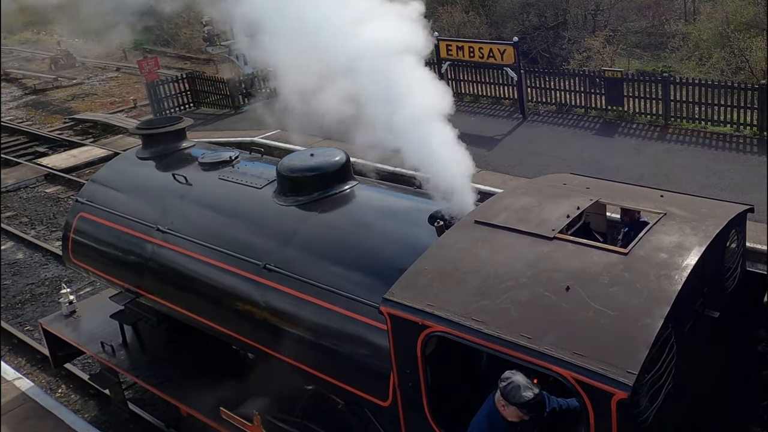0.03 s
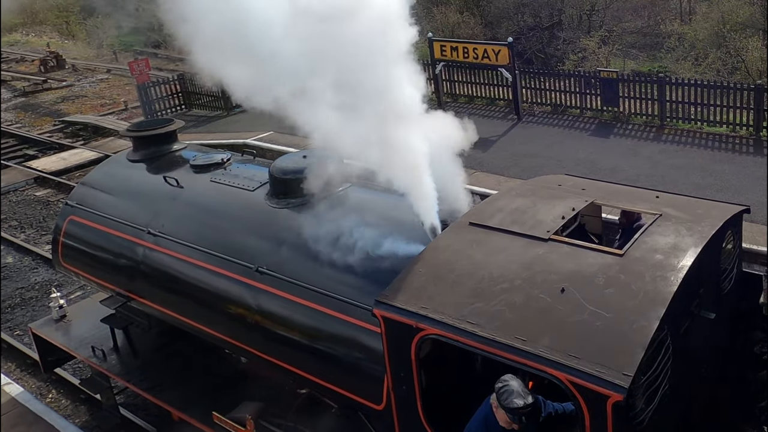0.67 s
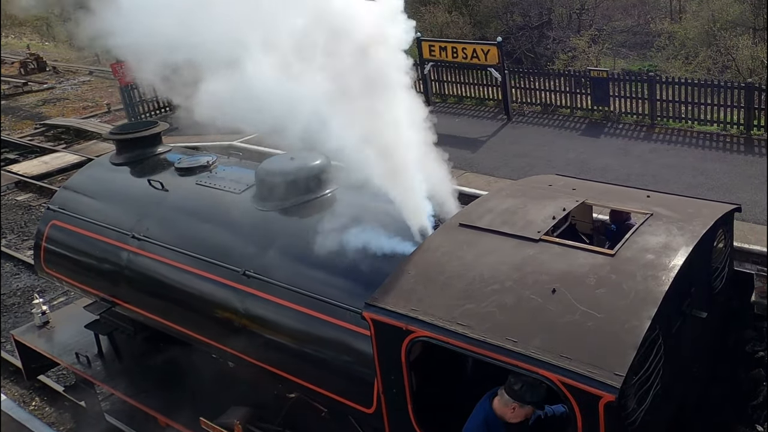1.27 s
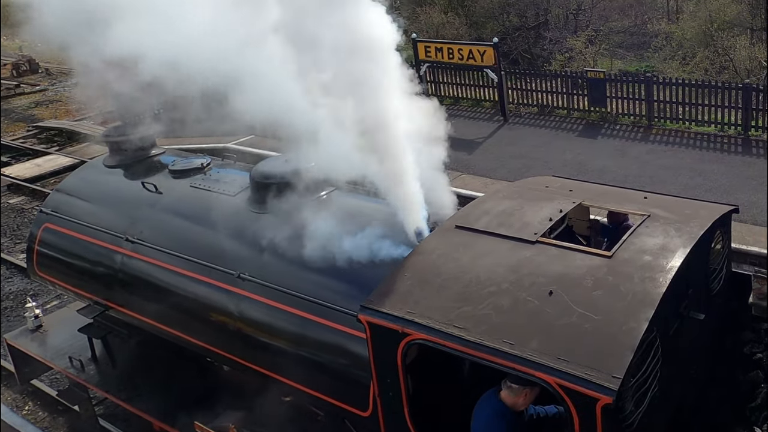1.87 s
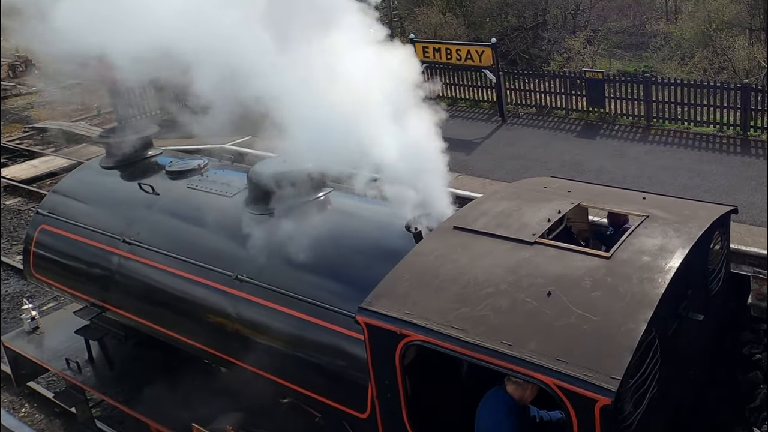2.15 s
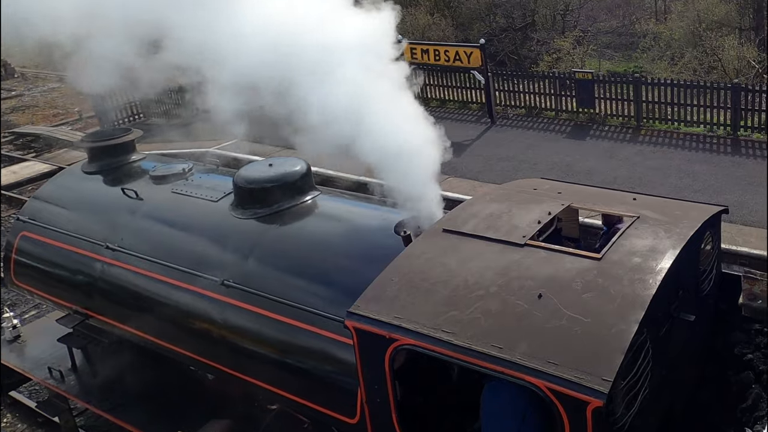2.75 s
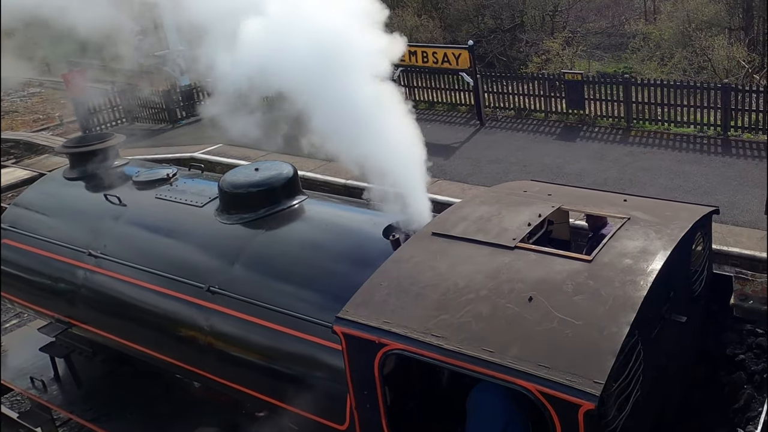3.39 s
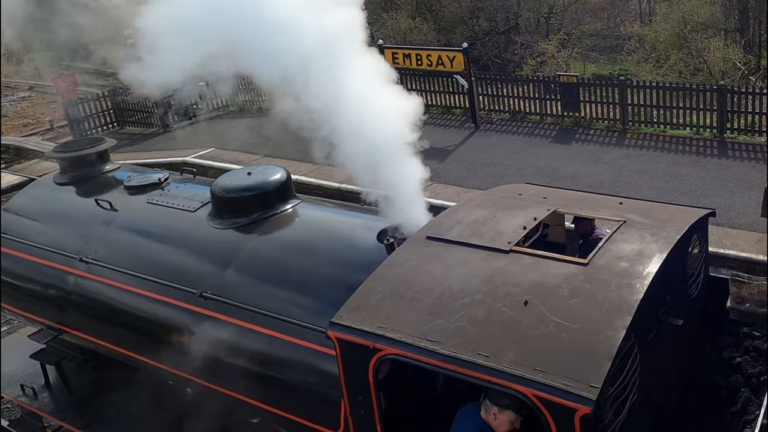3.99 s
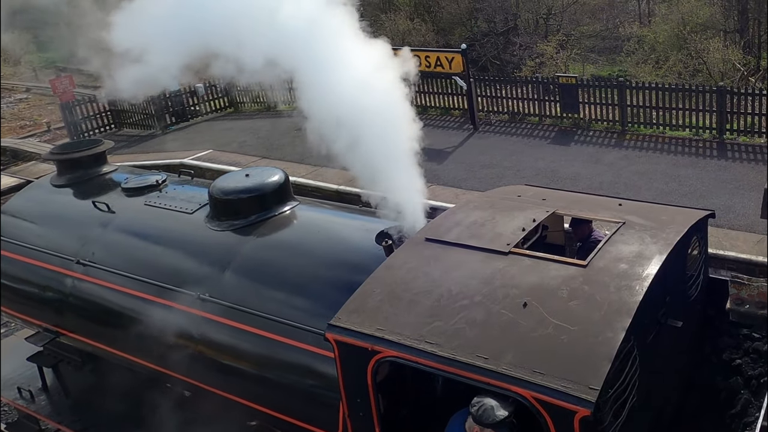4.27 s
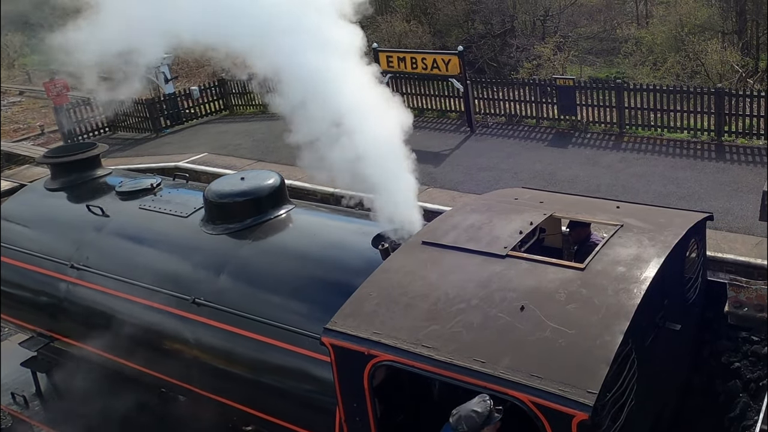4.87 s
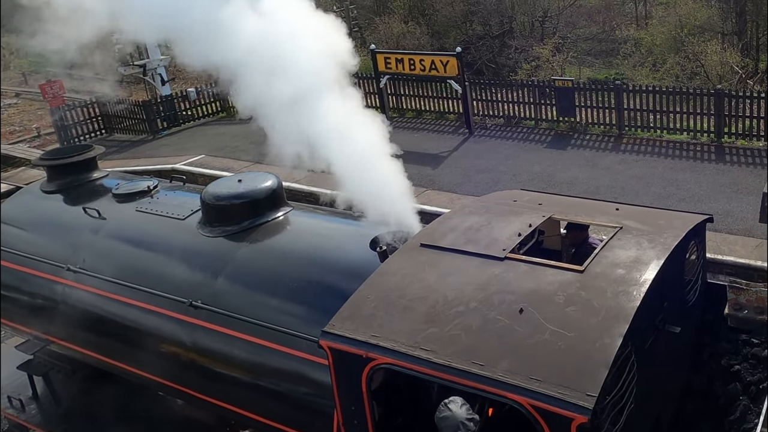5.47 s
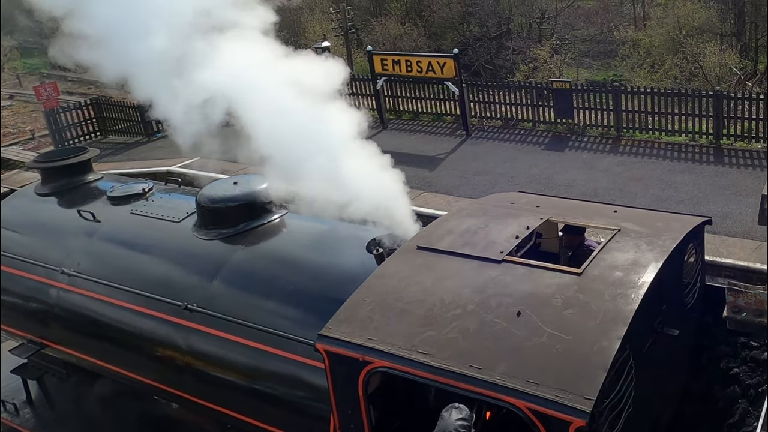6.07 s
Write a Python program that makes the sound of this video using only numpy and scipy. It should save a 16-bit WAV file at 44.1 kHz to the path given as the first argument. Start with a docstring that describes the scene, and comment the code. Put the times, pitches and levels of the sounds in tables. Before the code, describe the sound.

Steam hisses steadily from a standing locomotive, which gives a brief raspy toot followed by a longer, clear whistle.

```python
"""Just above the cab of a steam locomotive standing at a station. The safety valve blows throughout:
its turbulent jet hisses and roars. The whistle valve is eased open and wet steam spits through the
bell, a resonator that sounds a short hoarse blast, then a long clear one that rises as the bell warms.
Steel plates reflect the steam noise; the station and a wooded slope return the whistle.
An automatic gain control ducks the hiss under the whistle and lets it swell back afterwards."""
import sys
import numpy as np
from scipy import signal
from scipy.fft import rfft, irfft, next_fast_len
from scipy.io import wavfile
from scipy.ndimage import uniform_filter1d, minimum_filter1d, map_coordinates

SR = 44100
rng = np.random.default_rng(int(sys.argv[2]) if len(sys.argv) > 2 else 0)


def transcribe(signal):
    """Save signal, clipped to [-1, 1], as a 16-bit WAV file at the path in sys.argv[1]."""
    frames = np.atleast_2d(signal).T
    limited = np.clip(frames, -1, 1)
    pcm = np.round(limited * 32767).astype(np.int16)
    wavfile.write(sys.argv[1], SR, pcm)


N = 270806

# flow noise of the safety valve: (time [s], relative level [dB])
VALVE_FLOW = [(2.95, -37.5), (3.4, -39.5), (3.64, -40), (3.8, -40.5), (4.81, -35.5), (5.41, -37.5),
              (5.82, -37), (5.98, -38.5), (6.1, -37.5)]
# spectra of the safety valve's jet and plume: (frequency [Hz], relative density [dB])
JET_HISS = [(200, -24), (600, -10.5), (1000, -5.5), (1600, -5.5), (2600, -2), (3500, 0.5), (3950, -1.5),
            (4500, 1.5), (5200, -2.5), (6300, -5), (7100, -8.5), (8000, -19.5), (10000, -37)]
JET_FIZZ = [(6000, -25.5), (8000, 0.5), (9200, 1.5), (10500, -2), (12400, -3.5), (13800, -15),
            (15600, -16.5)]
PLUME_ROAR = [(60, -9.5), (160, 2.5), (235, 0.5), (310, -4.5), (420, 0.5), (530, 0.5), (700, -5),
              (1100, -4.5), (2000, -1), (4000, -24.5)]
PLUME_RUMBLE = [(12, -18.5), (25, -4), (45, 2), (65, -4), (105, -1), (150, -4), (195, -7), (250, -21),
                (600, -21.5)]
# nozzle resonances: (frequency [Hz], bandwidth [Hz], gain [dB])
NOZZLE_MODES = [(1059, 31, 1), (1278, 23, -9.5), (1460, 43, -4), (2110, 43, -11), (2470, 67, -6.5),
                (2810, 53, -11), (4590, 100, -9.5), (5530, 98, -9.5)]
# the hiss sags as the whistle valve snaps shut: (time [s], level change [dB])
SHUT_SAGS = [(1.029, -1.5), (2.105, -5)]
# reflections off tank and cab roof: (delay [s], gain [dB])
PLATE_ECHOES = [(.00136, -25), (.0053, -26), (.0078, -28), (.0092, -19), (0.0096, -22.5), (0.0121, -25.5)]
# the whistle valve is eased open, left ajar, then pulled wide; levels are relative:
# (start [s], rise [s], shut [s], jet [dB], spray [dB], puff [dB])
VALVE_PULLS = [(-.08, .665, .993, -30.5, -35, -38), (1.02, .12, 1.208, -48, -34, -46),
               (1.19, .05, 2.08, -33.5, -50, -27.5)]
# spectra of the whistle's jet, condensate and cloud: (frequency [Hz], relative density [dB])
WHISTLE_JET = [(120, -31.5), (350, 1.5), (520, -9.5), (850, 9), (1150, -5), (1350, 1), (1650, -2.5),
               (1930, 2.5), (2280, -0.5), (3100, 2.5), (3450, 4.5), (3750, -6.5), (3920, -19), (4200, -5.5),
               (4900, -13.5), (9000, -31), (15600, -38.5)]
CONDENSATE_SPRAY = [(500, -25), (2000, -21.5), (3400, -1.5), (4500, -3.5), (6200, -3.5), (7400, -11.5),
                    (9000, -24), (12400, -23), (15600, -46)]
CLOUD_BILLOW = [(12, -18.5), (35, -0.5), (65, -3), (110, -3), (180, 3.5), (250, -14.5), (360, -8.5),
                (600, -16.5)]
# slugs of water that spit, squeak and choke the tone: (time [s], half length [s], choke [dB])
WATER_SLUGS = [(0.955, 0.01, -12), (1.257, .004, -5.5), (1.299, 0.018, -7.5)]
# spells in which the bell locks into a tone: (start [s], length [s], level [dB], bend [Hz])
LOCKED_TONES = [(.84, .022, -26, 25), (.904, .012, -21, 20), (.985, .023, -17.5, 0),
                (1.183, .009, -18, -30), (1.201, .861, 0, 0)]
# the bell's pitch dips as water clears and climbs as it warms: (time [s], frequency [Hz])
BELL_PITCH = [(1.27, 787), (1.3, 797), (1.335, 774), (1.42, 768), (1.6, 788), (1.79, 802), (2.05, 803)]
# the bell's upper harmonics: (harmonic number, relative level [dB])
UPPER_HARMONICS = [(3, -24), (5, -40.5), (6, -42), (7, -53)]
# harmonics radiated mostly sideways: (harmonic number, relative upward level [dB], sideways level [dB])
EVEN_HARMONICS = [(2, -37.5, -22.5), (4, -49, -25)]
# relative gain of the two sets: (time [s], upper harmonics [dB], upward even harmonics [dB])
HARMONIC_GAINS = [(1.28, -51, -53.5), (1.474, -44, -56), (1.496, -42, -60), (1.542, -56.5, -50),
                  (1.672, -41.5, -46.5), (1.778, -39.5, -61), (1.902, -41.5, -51.5), (2.018, -41.5, -55),
                  (2.06, -41.5, -40)]
# reflections off fence, station wall, far buildings and hillside: (delay [s], gain [dB])
STATION_ECHOES = [(.065, -29.5), (.103, -18.5), (.28, -33.5), (.76, -47.5)]
# reverberation of the wooded slope: (frequency [Hz], time to decay by 60 dB [s])
SLOPE_DECAY = [(200, 0.72), (800, 2.18), (2500, 0.84), (9000, 1)]

t = np.arange(N) / SR


def amp(db):
    """Amplitude ratio of a level in decibels."""
    return 10 ** (np.asarray(db) / 20)


def unit(x):
    """Normalisation to rms 1."""
    return x / np.sqrt(np.mean(np.abs(x) ** 2) + 1e-20)


def along(points, hz):
    """Interpolation on a logarithmic frequency axis."""
    freqs, values = np.transpose(points)
    return np.interp(np.log(hz + 1), np.log(freqs + 1), values)


def curves(rows):
    """Linear interpolation in time of each column after the first."""
    times, *columns = np.transpose(rows)
    return [np.interp(t, times, column) for column in columns]


def bump(centre_s, half_s):
    """Gaussian pulse of height 1."""
    return np.exp(-((t - centre_s) / half_s) ** 2)


def step(centre_s, width_s):
    """Sigmoid rise from 0 to 1."""
    return .5 + .5 * np.tanh((t - centre_s) / width_s)


def envelope(start, attack_s, end, release_s, order=1):
    """Growth, hold and decay; order 2 rounds the foot of the attack and the shoulder of the release."""
    attack = np.clip((t - start) / attack_s, 0, 1) ** order
    return attack * np.exp(-(np.maximum(t - end, 0) / release_s) ** order)


def wobble(rate):
    """Random modulation: a spline through `rate` knots a second."""
    return map_coordinates(rng.standard_normal(int(N * rate / SR) + 4), [t * rate])


def filtered(x, response):
    """Linear filtering: the spectrum times a frequency response."""
    size = next_fast_len(N + SR // 2)
    return irfft(rfft(x, size) * response(np.fft.rfftfreq(size, 1 / SR)), size)[:N]


def echoes(x, paths):
    """Superposition of delayed, attenuated copies."""
    return sum(amp(db) * np.pad(x, (int(delay_s * SR), 0))[:N] for delay_s, db in paths)


def rush(spectrum, patchy_db):
    """Turbulence: eddies give shaped noise of rms 1 short patches of random gain."""
    cells = signal.stft(rng.standard_normal(N), nperseg=512)[2]
    eddies = uniform_filter1d(rng.standard_normal(cells.shape), size=7, axis=0)
    eddies = unit(uniform_filter1d(eddies, size=14, axis=1))
    noise = signal.istft(cells * amp(patchy_db * eddies), nperseg=512)[1][:N]
    cutoff_hz = 2 * spectrum[-1][0]
    return unit(filtered(noise, lambda hz: amp(along(spectrum, hz)) / (1 + (hz / cutoff_hz) ** 4)))


def narrow(hz, width_hz):
    """Random excitation of one resonance: narrowband noise of rms 1."""
    return unit(filtered(rng.standard_normal(N), lambda f: 1 / (1 + ((f - hz) / width_hz) ** 2)))


def nozzle_response(f):
    """Resonance: each nozzle mode adds a second-order band-pass to the direct sound."""
    return 1 + sum(amp(db) * 1j * f * width / (hz * hz - f * f + 1j * f * width)
                   for hz, width, db in NOZZLE_MODES)


def safety_valve(swell_db=13.5, fizz_db_per_s=1.35, rebound_db=0.5, rebound_s=0.26):
    """Jet noise: turbulent steam hisses and sings in the nozzle, above the plume's roar and rumble."""
    roar = amp(-16 + swell_db * bump(centre_s=3.57, half_s=0.82)) * rush(PLUME_ROAR, patchy_db=1.0)
    fizz = amp(-23 + fizz_db_per_s * t) * rush(JET_FIZZ, patchy_db=0.8)  # the jet grows finer
    hiss = amp(0.5) * rush(JET_HISS, patchy_db=0.6)
    singing = amp(-23 + t) * narrow(hz=4352, width_hz=28)  # gains 1 dB a second
    jet = filtered(hiss + singing + roar + fizz, nozzle_response)
    sag_db = sum(db * bump(time_s, half_s=0.019) for time_s, db in SHUT_SAGS)
    # once the long blast stops drawing steam, the hiss rebounds for a moment
    since_shut = np.maximum(t - SHUT_SAGS[-1][0], 0) / rebound_s
    surge_db = rebound_db * since_shut * np.exp(1 - since_shut)
    flutter_db = 0.21 * wobble(5.4) + 0.12 * wobble(60)
    flow = amp(-0.5 + curves(VALVE_FLOW)[0] + sag_db + surge_db + flutter_db)
    rumble = amp(-50.5 + 0.54 * wobble(7.4)) * rush(PLUME_RUMBLE, patchy_db=-0.85)
    return flow * jet + rumble


def steel_plates(x, scatter_db=-15, t60_s=0.08):
    """Comb filtering: sound reflected and scattered by nearby plates interferes with the direct sound."""
    lag = t[:SR // 20]
    scatter = rng.standard_normal(len(lag)) * amp(-60 * lag / t60_s)
    scattered = signal.fftconvolve(x, scatter / np.linalg.norm(scatter))[:N]
    return x + amp(scatter_db) * scattered + echoes(x, PLATE_ECHOES)


def whistle_valve(creep_db_per_s=6, puff_decay_s=0.19, billow_power=1.5):
    """Throttling: the strengths of jet, spray, cloud and bell excitation follow powers of the opening."""
    jet, spray, billow, stir = np.zeros((4, N))
    for start, rise_s, shut, jet_db, spray_db, puff_db in VALVE_PULLS:
        opening = np.clip((t - start) / rise_s, 0, 1)
        flow = envelope(start, 1 / SR, shut, release_s=.016)
        strength = flow * amp(jet_db + creep_db_per_s * (t - start - rise_s))
        crest = start + 0.92 * rise_s
        puff = envelope(start, crest - start, crest, puff_decay_s * billow_power) ** billow_power
        jet += strength * opening ** 2.65
        spray += flow * amp(spray_db) * opening ** 0.6
        billow += flow * amp(puff_db) * puff + amp(-15.5) * strength * opening ** billow_power
        stir += strength * opening ** 19.84
    return jet, spray, billow, stir


def wetness():
    """Entrained water: 1 while the whistle's steam is wet, 0 once it runs dry."""
    return 1 - step(centre_s=1.5, width_s=.02)


def whistle_steam(spit_db=2):
    """Two-phase flow: steam leaves the slot, spraying condensate and billowing into a cloud."""
    jet, spray, billow, _ = whistle_valve()
    slugs = sum(bump(time_s, half_s) for time_s, half_s, _ in WATER_SLUGS)
    sputter = amp(1.1 * wobble(35) + spit_db * slugs)
    squeak = slugs * spray / spray.max() * narrow(hz=1870, width_hz=90)
    # wet steam excites a high mode of the bell, which grows faster than the jet itself
    shriek = amp(-4) * (jet / jet.max()) ** 2 * wetness() * narrow(hz=4260, width_hz=120)
    hiss = amp(0.52) * jet * (rush(WHISTLE_JET, patchy_db=0.45) + shriek + squeak)
    droplets = amp(0.3) * spray * rush(CONDENSATE_SPRAY, patchy_db=0.5)
    cloud = amp(-0.4) * billow * rush(CLOUD_BILLOW, patchy_db=1.2)
    return sputter * (hiss + droplets) + cloud


def bell_ringing(phase, width_hz=46):
    """Forced resonance: a band of noise centred on a moving pitch."""
    return narrow(0, width_hz) * np.sin(phase) + narrow(0, width_hz) * np.cos(phase)


def bell_oscillation(sag_hz=62):
    """Self-oscillation: strength and pitch of a tone that builds, chokes and sags as pressure falls."""
    strength, bend_hz = np.zeros((2, N))
    for start, length, db, offset_hz in LOCKED_TONES:
        peak = amp(db)
        attack_s = .007 * (1 + 5 * peak)
        release_s = .011 * (1 + 1.5 * peak)
        strength += peak * envelope(start, attack_s, start + length, release_s, order=2)
        dying = step(start + length + peak * release_s, width_s=.014)
        bend_hz = np.where(t > start, offset_hz - sag_hz * dying, bend_hz)
    choke_db = sum(db * bump(time_s, half_s) for time_s, half_s, db in WATER_SLUGS)
    return strength * amp(choke_db), curves(BELL_PITCH)[0] + bend_hz


def whistle_note(stir_hz=808, slack_hz=60):
    """Mode locking: wet steam stirs the bell, dry steam holds a clear tone. Returns upward, sideways."""
    strength, pitch = bell_oscillation()
    stir, wet = whistle_valve()[3], wetness()
    jitter_hz = (1.94 + 4 * wet) * wobble(120)
    phase = 2 * np.pi * np.cumsum(pitch + jitter_hz) / SR
    loose_hz = stir_hz - slack_hz * np.exp(-stir / (.2 * stir.max()))  # a weak flow rings the bell flat
    hoarse = amp(-0.5) * stir * wet * bell_ringing(2 * np.pi * np.cumsum(loose_hz) / SR)
    rough = (amp(-2) * stir * (1 - wet) + amp(-21) * strength * wet) * bell_ringing(phase)
    partial = lambda k, db: amp(db + 0.86 * wobble(25)) * np.sin(k * phase)
    locked = np.sqrt(2) * strength
    upper_db, even_db = curves(HARMONIC_GAINS)
    overtones = amp(38.5 + upper_db) * sum(partial(k, db) for k, db in UPPER_HARMONICS)
    note = locked * (np.sin(phase) + overtones) + hoarse + rough
    upward = note + locked * amp(50 + even_db) * sum(partial(k, db) for k, db, _ in EVEN_HARMONICS)
    sideways = note + locked * sum(partial(k, db) for k, _, db in EVEN_HARMONICS)
    return upward, sideways


def station(x, wash_db=-30, dull_hz=2400):
    """Reflection: dull echoes from around the station, and faint reverberation from the wooded slope."""
    hz, lag, cells = signal.stft(rng.standard_normal(2 * SR), SR, nperseg=256)
    decay = amp(-60 * lag / along(SLOPE_DECAY, hz)[:, None])
    tail = signal.istft(cells * decay, SR, nperseg=256)[1]
    wash = signal.fftconvolve(x, tail / np.linalg.norm(tail))[:N]
    dull = filtered(x, lambda f: 1 / np.sqrt(1 + (f / dull_hz) ** 4))
    return amp(wash_db) * wash + echoes(dull, STATION_ECHOES)


def gain_control(x, ceiling_db=-12, slack_db=2, hold_s=0.47, release_db_per_s=23, settle_s=0.58):
    """Compression: a fast limiter curbs loud sound; a slow stage holds the gain, then lets it climb."""
    level_db = 10 * np.log10(np.abs(uniform_filter1d(x * x, size=220)) + 1e-12)
    limit_db = np.minimum(ceiling_db - level_db, 0)
    hold = int(hold_s * SR) // 2 * 2 + 1
    held_db = minimum_filter1d(np.minimum(limit_db + slack_db, 0), hold, origin=hold // 2, mode="nearest")
    climb_db = release_db_per_s * t
    slow_db = np.minimum.accumulate(held_db - climb_db) + climb_db
    # a lasting overload pushes the gain a little deeper
    pace = 1 / (settle_s * SR)
    overload_db = signal.lfilter([pace], [1, pace - 1], limit_db)
    return x * amp(np.minimum(slow_db, limit_db) + 0.17 * overload_db)


def scene():
    """Superposition: the whistle and its echoes over the safety valve."""
    upward, sideways = whistle_note()
    steam = whistle_steam()
    return (upward + station(sideways + steam) + steel_plates(steam + safety_valve()))[None]


def record(dry):
    """Gain control, then band limiting by a sharp low-pass."""
    return filtered(gain_control(dry[0]), lambda hz: hz < 15700)[None]


dry = scene()
out = record(dry)
transcribe(out)
```